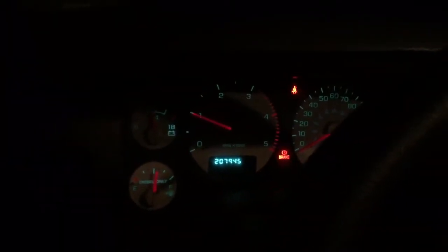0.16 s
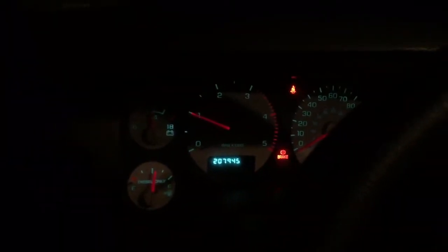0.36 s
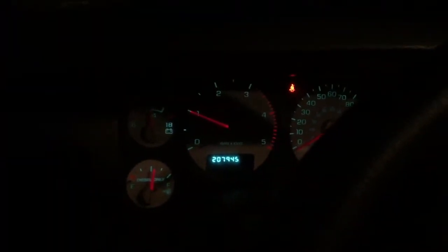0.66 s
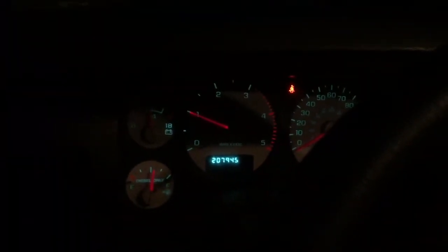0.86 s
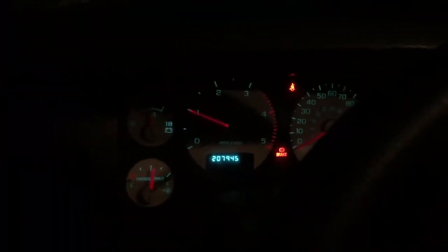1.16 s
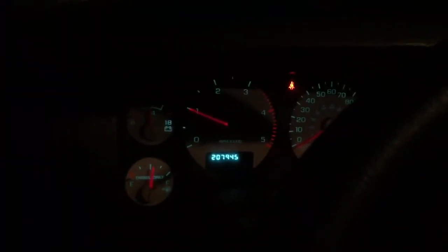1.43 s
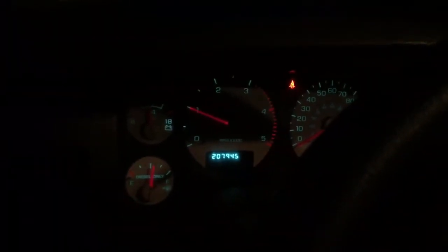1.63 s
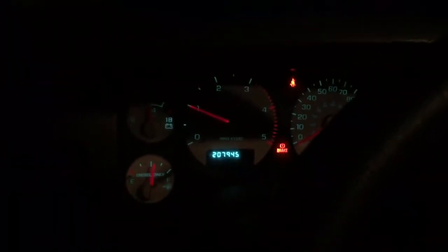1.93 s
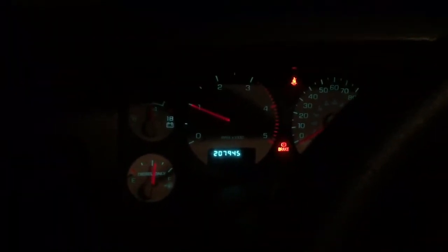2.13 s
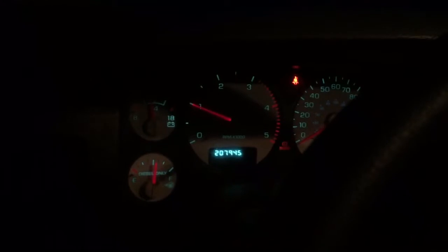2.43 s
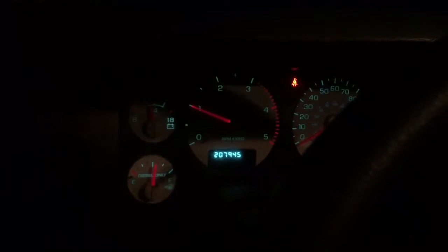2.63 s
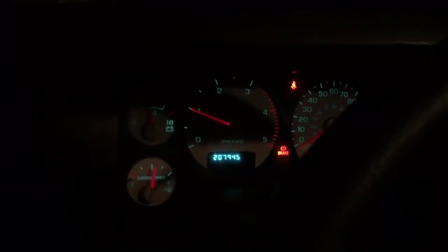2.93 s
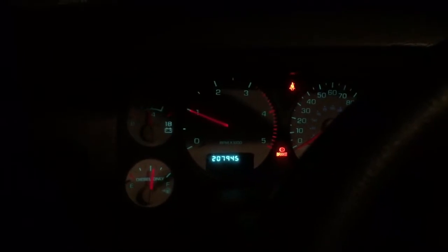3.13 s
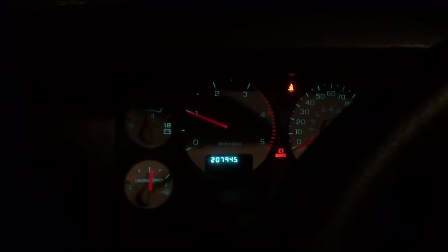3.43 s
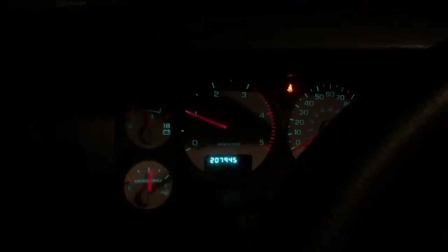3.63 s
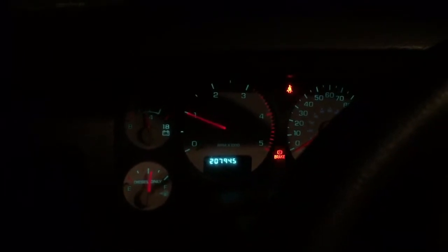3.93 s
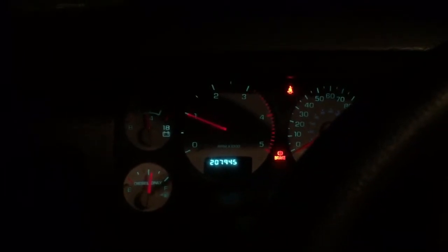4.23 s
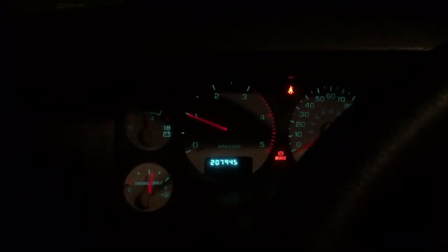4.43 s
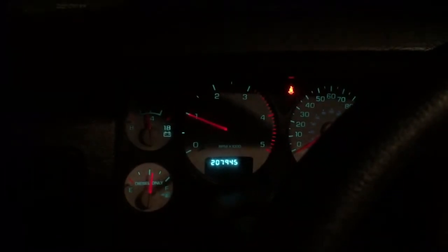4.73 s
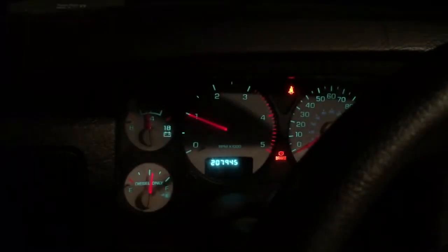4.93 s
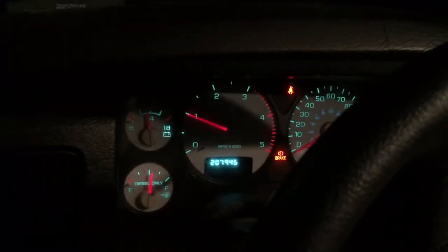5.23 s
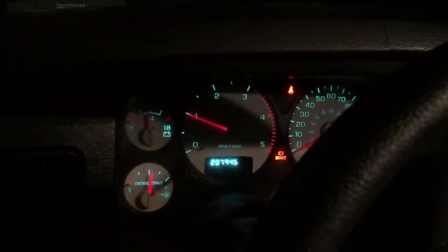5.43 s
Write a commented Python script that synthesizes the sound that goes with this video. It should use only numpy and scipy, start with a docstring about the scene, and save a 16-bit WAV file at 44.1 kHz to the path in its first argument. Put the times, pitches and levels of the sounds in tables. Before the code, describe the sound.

Steady cold diesel idle from the driver's seat: low throbbing rumble, muffled regular knocking, faint quick ticking and soft air rush.

```python
"""Six-cylinder diesel idling, from the driver's seat

One microphone in the closed cab hears a fast cold idle that creeps up in speed and sags twice.
Firings boom through mounts and floor as tones locked to the crank; timing gears and pumps hum above.
The block clatters nearly alike every cycle and rings its panels; air, belts and valve gear rush as noise.
Injectors tick thinly through the bulkhead, bursts ringing the fuel lines over a steady faint hiss.
Late on the load shifts: the speed drops a little and boom, hum and panel ring change colour."""
import sys
import numpy as np
from scipy import signal
from scipy.fft import rfft, irfft
from scipy.io import wavfile
from scipy.ndimage import map_coordinates

SR = 44100
rng = np.random.default_rng(int(sys.argv[2]) if len(sys.argv) > 2 else 0)


def persist_wave(psi):
    """Save psi, clipped to +-1, as 16-bit WAV."""
    counts = np.round(np.clip(psi, -1, 1) * 32767).astype(np.int16)
    wavfile.write(sys.argv[1], SR, np.atleast_2d(counts).T)


def invert_db(x):
    """Field ratio 10**(x/20) for x, a level in decibels (scalar or array-like)."""
    u = np.asarray(x, float) / 20
    return 10 ** u


N = 246078


def level(x, db):
    """Set the rms level."""
    return x * invert_db(db) / np.sqrt(np.mean(x ** 2))


def colour(x, points):
    """Shape a sound's spectrum by (frequency [Hz], gain [dB]) points, joined over log frequency."""
    hz, db = np.transpose(points)
    bins_hz = np.arange(N // 2 + 1) * SR / N + 1
    gain_db = np.interp(np.log(bins_hz), np.log(hz), db)
    return irfft(rfft(x) * invert_db(gain_db), N)


def ring(x, hz, width_hz):
    """One resonance, gain 1 at its centre."""
    return signal.lfilter(*signal.iirpeak(hz, hz / width_hz, fs=SR), x)


def walk(rate):
    """Smooth random drift, rate knots a second; spread near 1."""
    knots = rng.standard_normal(int(N / SR * rate) + 2)
    coarse = np.arange(0, N + 128, 128)
    drift = map_coordinates(knots, [coarse * rate / SR], order=2, mode="nearest")
    return np.interp(np.arange(N), coarse, drift)


def crank():
    """Engine cycles turned so far (two turns each) and the load, 0 before the shift and 1 after."""
    # brief dips in idle speed: (time [s], speed lost [rpm], half width to 1/e [s])
    sags = [(2.56, 17.1, .193), (4.075, 10.35, .187)]
    idle_rpm, climb_rpm_per_s, load_drop_rpm = 1001.73, .841, 9.62
    shift_s, shift_takes_s = 3.7, .15
    start_cycles = -.0113
    hunt_degrees, hunts_per_s = .8, 3  # the crank runs a little ahead or behind

    t = np.arange(N) / SR
    load = np.clip((t - shift_s) / shift_takes_s, 0, 1)
    rpm = idle_rpm + climb_rpm_per_s * t - load_drop_rpm * load
    for sag_s, lost_rpm, width_s in sags:
        rpm = rpm - lost_rpm * np.exp(-((t - sag_s) / width_s) ** 2)
    turned = np.cumsum(rpm) / (120 * SR)
    hunting = hunt_degrees / 720 * walk(hunts_per_s)
    return start_cycles + turned + hunting, load


def hum(cycles, load, times, before_db, after_db, angle, waver_db, slip):
    """One tone locked to the crank, wavering in strength and slipping a little in step."""
    db = before_db + (after_db - before_db) * load + waver_db * walk(5.0)
    phase = 2 * np.pi * times * cycles + angle + slip * walk(4.0)
    return np.sqrt(2) * invert_db(db) * np.cos(phase)


def boom(cycles, load):
    """Firing tones: all cylinders, the halves, pairs and one odd cylinder each arrive at their own angle."""
    # low tones: (times per cycle, rms level before the shift [dB], rms level after it [dB])
    boom_tones = [(5, -55, -57), (6, -31, -32), (7, -49, -52), (8, -37, -40), (9, -26, -27), (10, -40, -40),
                  (11, -41, -43), (12, -26.5, -26), (13, -48, -46), (14, -37, -45), (15, -42, -39),
                  (16, -31, -38), (17, -46, -43), (18, -29.5, -28), (19, -41, -43), (20, -48, -45),
                  (21, -37, -40), (22, -39, -38), (23, -45, -47), (24, -35, -40), (25, -45, -45),
                  (26, -48, -45), (27, -46, -47), (28, -49, -47), (29, -50, -54), (30, -45, -41),
                  (31, -50, -52), (32, -53, -57), (33, -53, -56), (34, -54, -53), (36, -49, -48),
                  (37, -60, -58), (38, -55, -52), (39, -56, -57), (40, -65, -55)]
    # by cylinders that share the pulse: group -> (lag [crank degrees], pulse skew [degrees of tone phase])
    trains = {6: (665, -75), 3: (624, -124), 2: (321, 23), 1: (90, 69)}
    # phase bend that sets the shape of the firing pulses; grows with times squared
    bend_rad = .071

    out = 0
    for times, before_db, after_db in boom_tones:
        times = int(times)
        lag, skew = trains[int(np.gcd(times, 6))]
        angle = np.radians(skew - times * lag / 2) + bend_rad * times ** 2
        # weak tones come from differences between cylinders, so they waver more
        loose = np.clip(-before_db - 16.5, 2, 20)
        out = out + hum(cycles, load, times, before_db, after_db, angle, 0.1 * loose, 0.027 * loose)
    return out


def gears(cycles, load):
    """Mesh tones of the timing gears and pumps; backlash shifts them all together."""
    # (times per cycle, rms level before the shift [dB], rms level after it [dB],
    # crank angle that sets each tone's phase [degrees])
    mesh_tones = [(42, -58, -64, 90), (50, -60, -56.5, 90), (60, -59, -66, 180), (72, -57.5, -53.5, 180),
                  (75, -59.5, -63, 180), (84, -58.5, -58.5, 300), (90, -59, -60, 200), (99, -55, -70, 228),
                  (100, -52, -68, 228), (101, -58.5, -66, 228), (103, -60, -68, 228), (104, -59, -61, 63.4),
                  (105, -51, -53, 63.4), (106, -57, -64, 63.4), (114, -59, -66, 300),
                  (134, -58.5, -70, 430), (135, -59, -65, 430), (140, -54.5, -70, 430),
                  (144, -52.5, -69, 430), (145, -55.5, -62, 430), (146, -51.5, -50.5, 430),
                  (168, -59.5, -67, 90)]

    meshing = cycles + 0.00037 * walk(4.61)
    out = 0
    for times, before_db, after_db, degrees in mesh_tones:
        angle = -np.radians(int(times) * degrees / 2)
        out = out + hum(meshing, load, int(times), before_db, after_db, angle, 1.3, .15)
    return out


def repeating(cycles, memory):
    """Noise tied to crank angle: each cycle keeps most of the last one's pattern."""
    size = 2048  # points per cycle
    fresh = rng.standard_normal((int(cycles[-1]) + 12, size))
    patterns = signal.lfilter([np.sqrt(1 - memory ** 2)], [1, -memory], fresh, axis=0)
    pattern = patterns[8:].ravel()  # the first cycles let the memory settle
    return np.interp((cycles + 1) * size, np.arange(pattern.size), pattern)


def clatter(cycles, load):
    """Block knock and the panels it rings, each panel swelling at its own crank angle."""
    # block knock through the bulkhead: (frequency [Hz], relative density [dB per Hz])
    block = [(200, -31), (340, -3.5), (480, -7), (620, -3.5), (780, -6), (1000, -4), (1200, -3),
             (1450, -11), (1700, -18), (1920, -19), (2250, -20), (2600, -25), (3300, -34.5), (5000, -41),
             (7000, -70.5)]
    # resonances: (frequency [Hz], width [Hz], rms level before throbbing [dB],
    # angle of a hard knock [crank degrees], knocks per cycle, throb before the shift [dB])
    panels = [(599, 29, -56.5, 181, 1, 0), (865, 71, -57.5, 70, 1, 4), (948, 29, -59, 89, 1, 2.5),
              (1058, 39, -57.5, 330, 1, 2.5), (1205, 61, -59, 410, 1, 6), (1402, 62, -55.5, 580, 1, 1.5),
              (1600, 61, -63, 250, 2, 2), (2070, 70, -70, 590, 2, 2), (2236, 80, -61, 690, 2, 4.5),
              (2368, 46, -72.5, 760, 2, 0.5), (2650, 70, -73, 550, 2, 3.5), (3147, 45, -73.5, 150, 6, 2.5),
              (3570, 100, -76.5, 170, 6, 1)]
    # under load the panels ring more evenly and a little less
    loaded_throb, loaded_ring_db = 0.33, -1

    knock = level(colour(repeating(cycles, 0.895), block), -43.0)
    out = knock * invert_db(0.65 * walk(3.2))
    depth = 1 - (1 - loaded_throb) * load
    for hz, width_hz, db, degrees, knocks, throb_db in panels:
        beat = np.cos(2 * np.pi * round(knocks) * (cycles - degrees / 720))
        throb = invert_db(throb_db * depth * beat + loaded_ring_db * load + 0.96 * walk(2.6))
        out = out + level(ring(repeating(cycles, .88), hz, width_hz), db) * throb
    return out


def rush(cycles):
    """Air, belts and valve gear: noise that never repeats, lifted a little by each firing."""
    # spectrum: (frequency [Hz], relative density [dB per Hz])
    rush_colour = [(25, -20), (50, 0.5), (150, 6.5), (300, -9.5), (500, -13), (1200, -12), (1600, -20.5),
                   (1900, -24), (3000, -33), (4500, -42), (6500, -49.5), (10000, -50), (15500, -52.5)]

    firing_db = 1.3 * np.cos(2 * np.pi * (6 * cycles - .16))
    puff = invert_db(firing_db + 0.44 * walk(3.7) + 1.2 * walk(17.5))
    return level(colour(rng.standard_normal(N), rush_colour), -41.5) * puff


def ticks(cycles):
    """A sharp burst at each injection with a short rattle after it, ringing the fuel lines."""
    # in firing order, before chance: (lateness [crank degrees], relative strength [dB])
    injectors = [(.7, .3), (1.5, -.7), (-1.4, .4), (4.6, -.1), (-.8, -.1), (-1.1, -1.7)]
    # fuel line resonances: (frequency [Hz], width [Hz], relative rms level [dB])
    line_rings = [(3780, 240, -9), (4400, 140, -8.5), (4640, 130, -10), (4720, 130, -8), (5300, 110, -7),
                  (5400, 110, 0.5), (6530, 150, -10.5), (7040, 140, -13.5), (8190, 240, -10.5),
                  (8860, 150, -15.5), (9540, 200, -15.5), (10000, 150, -17.5), (11550, 280, -11.5),
                  (12100, 350, -9.5), (13500, 250, -14), (15550, 280, -14.5)]
    # spray heard broadly: (frequency [Hz], gain [dB])
    spray = [(2500, -31.5), (4000, 0.0), (7000, -8.0), (12500, -5.0), (16000, -10.0)]

    count = int(6 * cycles[-1]) + 1
    late, db = np.array(injectors)[np.arange(count) % 6].T
    chance = rng.standard_normal((count, 2)).T
    degrees = 120 * np.arange(count) + late + 1 + 2.5 * chance[0]
    places = np.interp(degrees / 720, cycles, np.arange(N)).astype(int)
    blows = np.zeros(N)
    blows[places] = invert_db(db + 1.1 * chance[1])

    t = np.arange(int(.025 * SR)) / SR
    shape = (1 - np.exp(-t / 0.00042)) * (np.exp(-t / 0.0012) + 0.29 * np.exp(-t / .007))
    # a steady faint treble hiss fills the gaps between ticks
    burst = signal.fftconvolve(blows, shape)[:N] + 0.105

    # the needle's own blow rings every line alike; the spray behind it is different each time
    rung = 0
    for hz, width_hz, ring_db in line_rings:
        struck = 2.8 * blows + burst * rng.standard_normal(N) / 2.5
        rung = rung + level(ring(struck, hz, width_hz), ring_db)
    broad = colour(burst * rng.standard_normal(N), spray)
    return level(rung, -66.5) + level(broad, -76.5)


def scene():
    """Everything but the hiss and drifts turns with the crank: two turns make a cycle of six firings."""
    cycles, load = crank()
    low = boom(cycles, load) + gears(cycles, load)
    mix = low + clatter(cycles, load) + rush(cycles) + ticks(cycles)
    return mix[None]


def top_cut(x):
    """Nothing passes above the cut-off."""
    return signal.sosfilt(signal.butter(12, 15830, fs=SR, output="sos"), x)


def record(dry):
    """The single microphone's sound as kept."""
    return top_cut(dry)


dry = scene()
out = record(dry)
persist_wave(out)
```